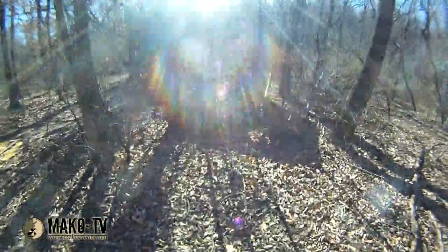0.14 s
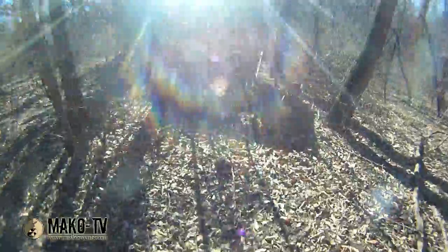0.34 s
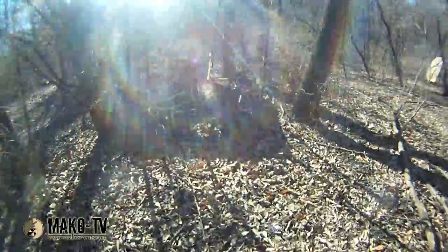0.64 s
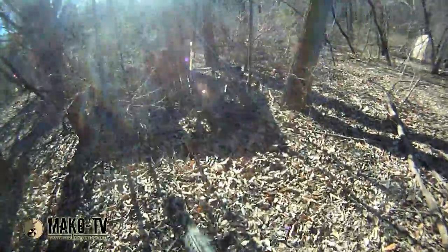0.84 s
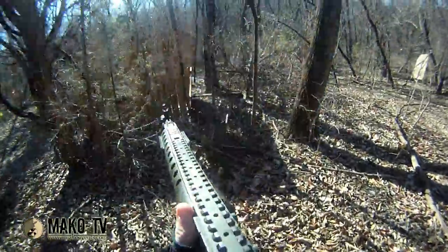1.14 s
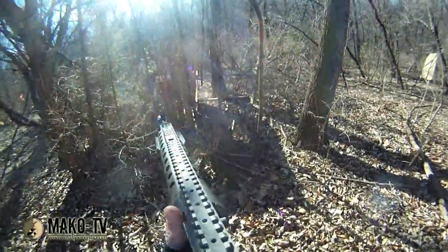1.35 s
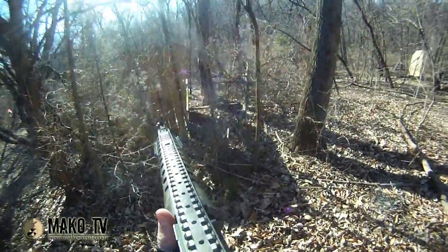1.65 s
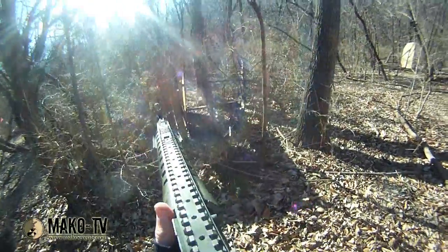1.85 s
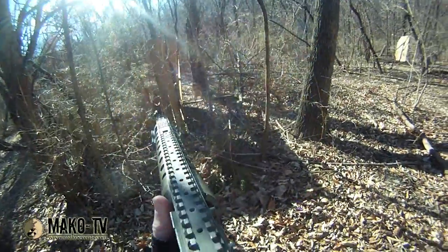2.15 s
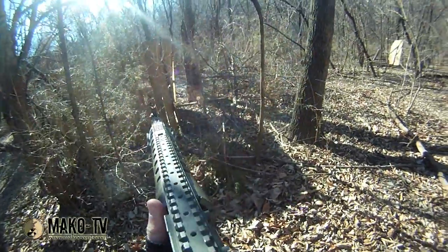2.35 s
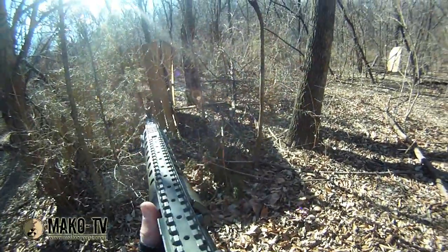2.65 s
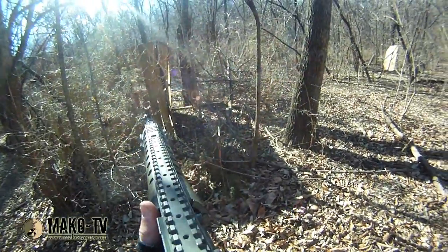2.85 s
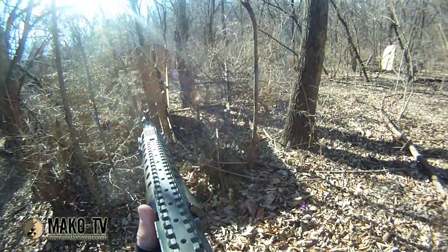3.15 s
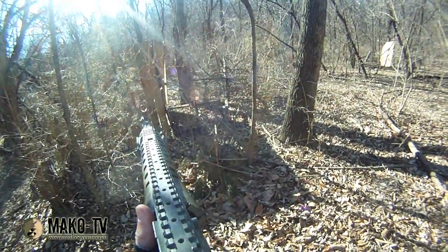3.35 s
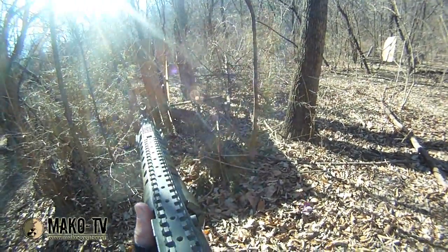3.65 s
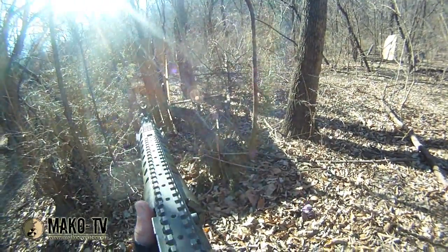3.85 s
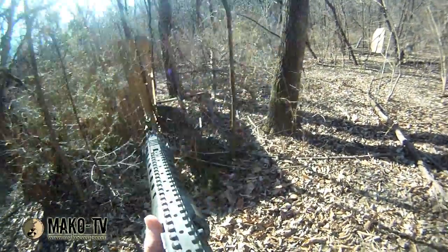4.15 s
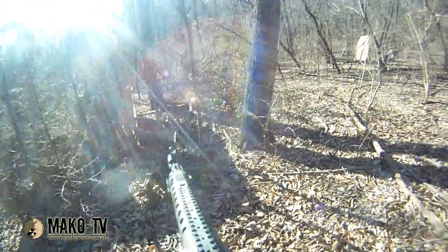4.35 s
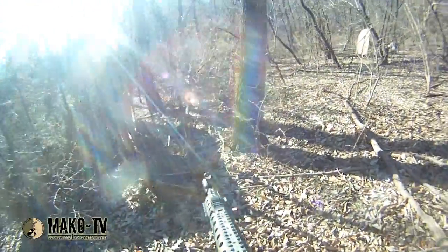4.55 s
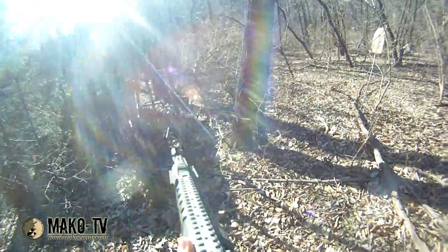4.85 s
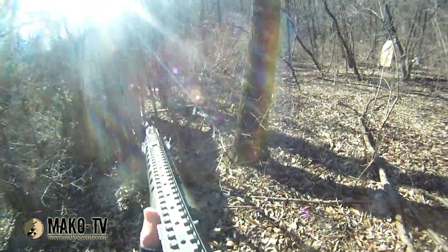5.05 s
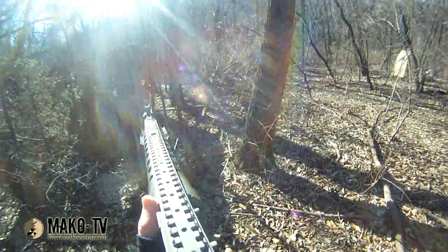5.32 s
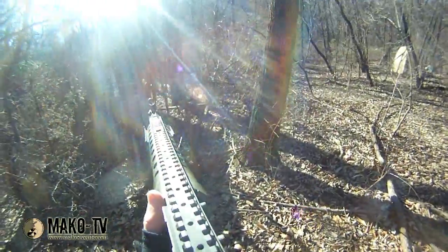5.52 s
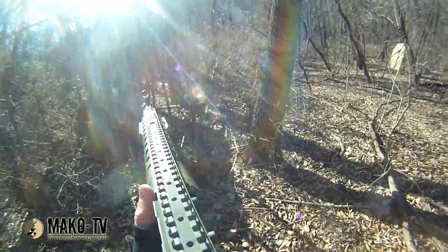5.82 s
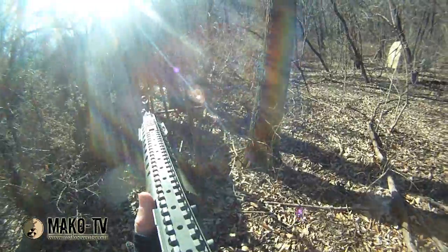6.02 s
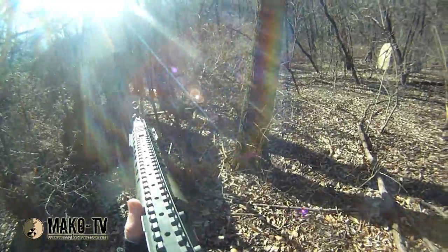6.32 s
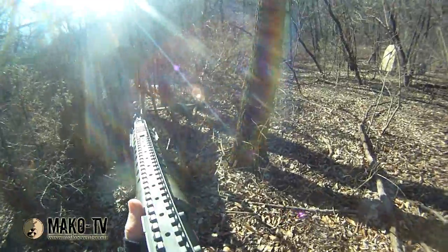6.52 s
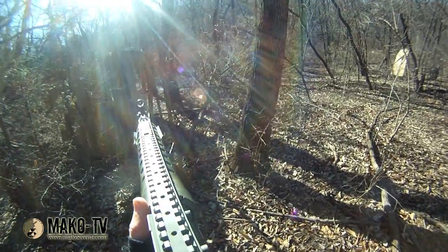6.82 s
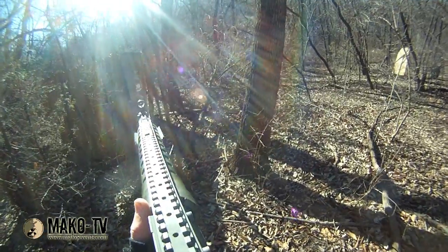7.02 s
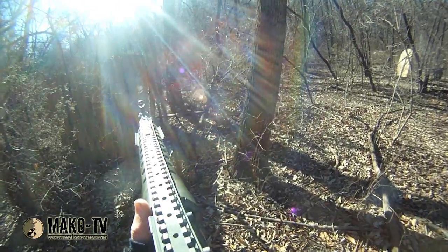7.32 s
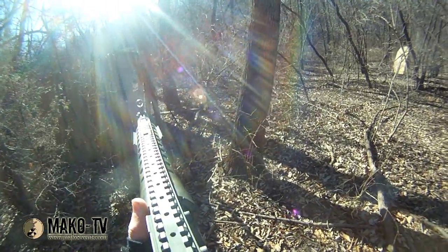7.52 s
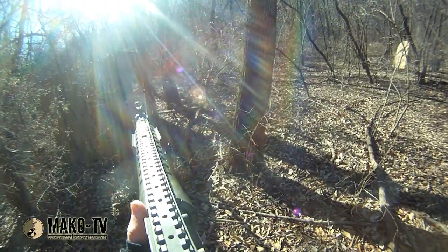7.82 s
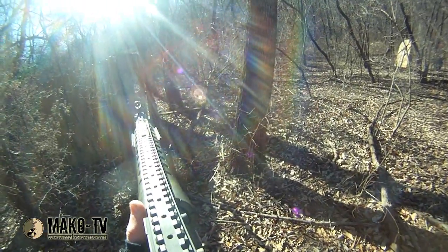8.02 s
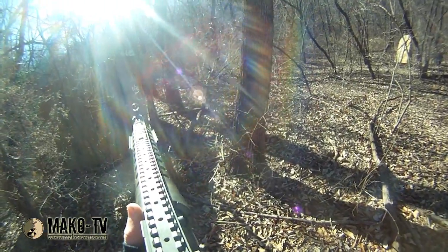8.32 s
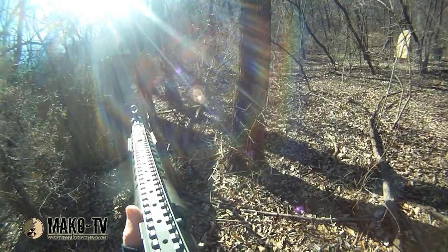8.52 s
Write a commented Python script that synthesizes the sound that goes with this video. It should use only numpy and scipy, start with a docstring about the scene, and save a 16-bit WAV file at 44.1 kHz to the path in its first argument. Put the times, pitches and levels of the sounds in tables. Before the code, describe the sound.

A small cased microphone sits close to an airsoft player in dry woodland. From 0 to 0.8 s wind buffets it and gear knocks the hollow case, hardest around 0.3 to 0.45 s, while bright cracks from other guns snap at 0, 0.6, 1.2 and 1.6 s with faint echoes off trunks. Leaves crackle softly and a brief drag rustles at 1.9 s. From 2.4 to 3.2 s the close electric rifle fires six single shots about 0.15 s apart, each a short gear whirr, a catch click and a loud dry piston clack with a small rebound rattle. Between 4.2 and 5.2 s come wind, sharp clicks, a faint far automatic burst, a crack and a light case knock. Clicks continue. Three shots follow at 6.0 to 6.3 s, four at 7.0 to 7.5 s, two at 8.2 to 8.35 s, then a faint rapid far burst to the end.

```python
"""Airsoft rifle in a wood

An electric airsoft rifle fires fifteen single shots in four groups, close to a small cased camera.
Each trigger pull spins the gearbox up (whine and gear noise), cocks the piston and lets it slam (damped rings).
Other players' guns crack among the trees, gear knocks the camera case (clicks and rings), dry leaves rustle
and wind buffets the microphone (shaped noise)."""
import sys
import numpy as np
from scipy import signal
from scipy.fft import rfft, irfft, next_fast_len
from scipy.io import wavfile
from scipy.ndimage import map_coordinates

SR = 44100
rng = np.random.default_rng(int(sys.argv[2]) if len(sys.argv) > 2 else 0)


def bounce(signal):
    """Save signal as a 16-bit WAV file at the path given by the first command-line argument."""
    frames = np.transpose(np.atleast_2d(signal))
    limited = np.clip(frames, -1, 1)
    pcm = np.round(limited * 32767).astype(np.int16)
    wavfile.write(sys.argv[1], SR, pcm)


N = 382347  # length of the scene in samples


def amp(db):
    """Decibels to a plain factor."""
    return 10 ** (np.asarray(db) / 20)


def unit(x):
    """Scales x to an RMS of 1."""
    return x / np.sqrt(np.mean(x ** 2) + 1e-20)


def coloured(x, spectrum):
    """x through the causal filter with these (Hz, dB) points; white noise keeps its power."""
    f, db = np.transpose(spectrum)
    hz = np.fft.rfftfreq(4096, 1 / SR)
    gain = amp(np.interp(np.log(hz + 1), np.log(f + 1), db))
    # folding the cepstrum gives the minimum-phase pulse: its energy comes as early as possible
    cepstrum = irfft(np.log(gain + 1e-6))
    cepstrum[1:2048] *= 2
    cepstrum[2049:] = 0
    pulse = irfft(np.exp(rfft(cepstrum)))
    return signal.fftconvolve(x, pulse / np.linalg.norm(pulse))[:len(x)]


def wobble(rate, size=N):
    """A smooth random curve, rate knots a second."""
    knots = rng.standard_normal(int(size * rate / SR) + 4)
    return map_coordinates(knots, [np.arange(size) * rate / SR])


def add(out, s, sound):
    """Mixes sound into out from time s on."""
    part = out[max(round(s * SR), 0):][:len(sound)]
    part += sound[:len(part)]


def ring(modes, t, attack, scatter_db):
    """Damped modes after one blow, each a sine that loses 60 dB in its t60."""
    total = np.zeros(len(t))
    for hz, db, t60 in modes:
        level = amp(db + scatter_db * rng.standard_normal() - 60 * t / t60)
        total += level * np.sin(2 * np.pi * hz * t)
    return total * (1 - np.exp(-t / attack))


def burst(t, t60):
    """Noise that starts with a sharp edge and dies away."""
    edge = 0.64 * amp(-60 * t / 0.0018)
    return (amp(-60 * t / t60) + edge) * rng.standard_normal(len(t))


def level_curve(s, db):
    """A level that glides between (seconds, dB) points, as a plain factor."""
    return amp(np.interp(np.arange(N) / SR, s, db))


# Strength of the wind over time. Each row: time in seconds, deep buffeting in dB, flutter in dB.
WIND_LEVELS = [(0.0, -27, -20), (0.1, -38, -39), (0.21, -30.5, -25.5), (0.38, -40.5, -44.5),
               (0.5, -28, -31), (0.65, -33, -31), (0.86, -45, -50), (1.09, -42, -42), (1.31, -31, -36.5),
               (1.54, -45.5, -44), (4.12, -45.5, -44.5), (4.3, -37, -32), (4.45, -31, -27.5),
               (4.6, -30.5, -41), (4.85, -42, -42.5), (5.09, -31, -36.5), (5.2, -37, -44), (5.4, -41, -43),
               (5.9, -46, -45.5), (6.44, -43, -50.5), (6.53, -32, -40.5), (6.8, -36, -41),
               (6.9, -46.5, -48.5), (8.67, -46, -44)]
# Tone colour of the deep buffeting. Each row: frequency in Hz, relative level in dB.
BUFFET_COLOUR = [(12, -36), (20, -15), (59, 0.5), (110, -7.5), (140, -43), (240, -120)]
# Tone colour of the flutter. Each row: frequency in Hz, relative level in dB.
FLUTTER_COLOUR = [(47, -34), (80, -2.5), (151, -4.5), (252, -12.5), (302, -15.5), (450, -24), (580, -54),
                  (990, -120)]


def wind():
    """Wind pushes on the microphone in uneven lumps: deep noise plus a faster, higher flutter."""
    s, deep_db, flutter_db = np.transpose(WIND_LEVELS)
    deep_lumps = amp(2.1 * wobble(6) + 1.25 * wobble(20))
    deep = unit(deep_lumps * coloured(rng.standard_normal(N), BUFFET_COLOUR))
    flutter_lumps = amp(2 * wobble(8) + 3.9 * wobble(35))
    flutter = unit(flutter_lumps * coloured(rng.standard_normal(N), FLUTTER_COLOUR))
    return level_curve(s, deep_db) * deep + level_curve(s, flutter_db) * flutter


# Strength of the wood's own sound. Each row: time in seconds, low murmur in dB, leaves in dB.
AIR_LEVELS = [(0.0, -32.5, -36.5), (0.17, -41.5, -45), (0.42, -29.5, -43.5), (0.59, -48, -57),
              (0.75, -39.5, -49.5), (1.02, -43.5, -52), (1.32, -41, -46), (1.84, -42.5, -51),
              (2.02, -45, -52.5), (2.3, -47.5, -52.5), (3.25, -44, -50), (3.55, -47, -55),
              (3.8, -45.5, -49), (4.22, -46.5, -48), (4.65, -45, -53.5), (5.09, -44, -49), (6.4, -44, -47),
              (6.95, -47, -50.5), (7.53, -45.5, -46), (8.05, -47.5, -61.5), (8.4, -39, -46.5),
              (8.67, -50, -53.5)]
# Tone colour of the murmur, also used for case clicks and thuds. Each row: frequency in Hz, relative level in dB.
MURMUR_COLOUR = [(150, -30), (250, -9), (323, -5), (393, -9), (457, -6), (568, -3), (623, -4), (705, -7.5),
                 (1200, -35), (1560, -45), (2640, -120)]


def murmur():
    """The low murmur of the wood: shaped noise whose level wavers a little."""
    s, murmur_db, _ = np.transpose(AIR_LEVELS)
    wavering = amp(2 * wobble(30))
    noise = unit(wavering * coloured(rng.standard_normal(N), MURMUR_COLOUR))
    return level_curve(s, murmur_db) * noise


TWIGS_PER_S, TWIG_DB, TWIG_SPREAD_DB = 20, 4, 3.5  # average rate, typical level and its spread
# Tone colour of the leaves. Each row: frequency in Hz, relative level in dB.
LEAVES_COLOUR = [(590, 0.5), (1000, -4), (1150, -3), (1330, -2), (1420, -9.5), (1720, -2.5), (1850, -2.5),
                 (2180, 1.5), (2510, 2), (3150, 0.5), (3660, -6), (4970, -4), (6000, -16.5), (7800, -44),
                 (13200, -120)]


def leaves():
    """Leaves crackle unevenly: wavering noise, with short bumps where single leaves and twigs snap."""
    s, _, leaves_db = np.transpose(AIR_LEVELS)
    snaps_now = rng.random(N) < TWIGS_PER_S / SR
    ticks = snaps_now * amp(TWIG_DB + TWIG_SPREAD_DB * rng.standard_normal(N))
    fading_ticks = signal.lfilter([1], [1, -np.exp(-1 / (0.0032 * SR))], ticks)  # fades over 3.2 ms
    crackle = amp(0.97 * wobble(110)) + fading_ticks
    return level_curve(s, leaves_db) * unit(coloured(crackle * rng.standard_normal(N), LEAVES_COLOUR))


# Knocks on the camera case. Each row: time in seconds, level in dB, damping (divides the ring times).
CASE_KNOCKS = [(0.002, -13.5, 0.84), (0.176, -19.5, 0.8), (0.325, -7.5, 1.6), (0.349, -4, 1.03),
               (0.375, -15, 1.26), (0.419, -6, 1.2), (0.462, -21, 3.3), (0.765, -10.5, 1.7),
               (1.597, -17.5, 1.44), (5.033, -19, 0.95)]
# How the hollow case rings. Each row: frequency in Hz, level in dB, time to fall 60 dB in seconds.
CASE_MODES = [(603.7, -1, 0.14), (1325, -29, 0.16), (424, -15, 0.103)]


def knocks():
    """Each knock clicks and rings the hollow case; a hand on it damps the ring."""
    rings, clicks = np.zeros((2, N))
    t = np.arange(SR // 4) / SR
    for s, db, damping in CASE_KNOCKS:
        modes = [(hz, level, t60 / damping) for hz, level, t60 in CASE_MODES]
        wavering = amp(db - 1.5 + 1.5 * wobble(150, len(t)))
        add(rings, s, wavering * ring(modes, t, 0.0006, 0.91))
        add(clicks, s, amp(db - 8.5) * burst(t, 0.011))
    return rings + coloured(clicks, MURMUR_COLOUR)


# Another player's gun. Each row: time in seconds, level in dB, pitch in Hz, echo in dB relative to the crack.
RIVAL_SHOTS = [(0.0195, -15, 2840, -21.5), (0.595, -14, 2230, -17), (1.2058, -13.5, 2250, -18.5),
               (1.6291, -17, 2270, -13.5), (4.6929, -21.5, 2850, -15)]
RIVAL_T60, RIVAL_THUD_DB = 0.037, -5.5  # fall time in seconds, thud relative to the crack
# the second crack of a rival's shot: delay, level relative to the first, pitch, thud
SECOND_S, SECOND_DB, SECOND_HZ, SECOND_THUD_DB = 0.0163, -8, 2225, 2
# Single clicks of pellets, twigs and gear. Each row: time in seconds, level in dB, pitch in Hz,
# time to fall 60 dB in seconds, thud in dB relative to the click.
SMALL_CLICKS = [(0.1765, -33, 1850, 0.05, 8.5), (0.3117, -21, 2400, 0.018, -9),
                (0.7162, -26, 2980, 0.028, -18), (0.8679, -24.5, 2130, 0.024, -14),
                (0.9639, -17.5, 2730, 0.027, -5.5), (1.4726, -34.5, 2190, 0.024, 9),
                (2.238, -38.5, 2520, 0.017, 8), (2.277, -41, 4830, 0.022, -12),
                (3.5382, -36.5, 2560, 0.022, 0), (3.9838, -36, 4020, 0.02, -6),
                (4.157, -32, 2850, 0.037, -6), (4.2303, -26, 2330, 0.016, -25),
                (4.5259, -18, 2710, 0.043, -14), (4.5829, -27, 2900, .029, 2.5),
                (4.62, -35.5, 2930, .03, -19), (4.7598, -22, 2350, 0.04, -14),
                (4.792, -30.5, 2830, 0.048, -18), (5.0549, -30, 3060, 0.02, -5),
                (5.6215, -33.5, 2300, 0.027, -8), (5.7028, -36, 2320, .025, -17),
                (5.788, -33.5, 1640, 0.042, -10), (6.2285, -18, 3025, 0.016, -14),
                (6.3837, -21, 2950, 0.029, -11), (6.492, -33, 1960, .029, -14),
                (6.8987, -32.5, 2700, .025, -16), (7.217, -21.5, 3060, 0.074, -7),
                (7.2408, -18.5, 2240, 0.051, -11), (7.5336, -30.5, 2780, 0.018, -7),
                (7.6221, -39, 2660, 0.015, -14), (7.6786, -36, 2110, .01, -22),
                (7.8032, -30.5, 3640, .03, -17), (7.86, -44, 3030, .02, -10),
                (8.0007, -24, 2260, 0.02, -31), (8.0696, -35.5, 4300, .025, -14),
                (8.089, -37.5, 2230, 0.048, -14)]
CLICK_ECHO_DB = -24.5  # for the small clicks and the far gun
# A far gun on automatic fire. Each row: first shot in seconds, number of shots, shots per second, level in dB.
FAR_GUN_BURSTS = [(4.385, 3, 21.4, -37.5), (8.4115, 7, 23.8, -36.5)]
FAR_HZ, FAR_T60, FAR_THUD_DB = 2720, 0.029, -27  # average pitch, fall time in seconds, thud
# Tone colour of the snaps, also of drags through leaves. Each row: frequency in Hz, relative level in dB.
DRAG_COLOUR = [(290, -63), (500, 5.5), (669, -4.5), (1070, -11), (1540, -10), (2990, -2), (3920, -8.5),
               (4260, -14.5), (4870, -4), (6000, -20), (7800, -33), (13200, -120)]
# Tone colour of the echo from the trees. Each row: frequency in Hz, relative level in dB.
ECHO_COLOUR = [(590, -40), (1000, -11), (1490, -7), (1910, -8), (2200, 4.5), (2770, 0), (3150, 0),
               (3630, -13), (3970, -2), (4310, -16), (4860, -5), (5650, -11.5), (6000, -33), (7800, -38),
               (13200, -120)]


def crack_events():
    """Lists every crack and click as (seconds, dB, pitch Hz, t60 seconds, thud dB, echo dB)."""
    events = []
    for s, db, hz, echo_db in RIVAL_SHOTS:
        events.append((s, db, hz, RIVAL_T60, RIVAL_THUD_DB, echo_db))
        events.append((s + SECOND_S, db + SECOND_DB, SECOND_HZ, RIVAL_T60, SECOND_THUD_DB, echo_db))
    for s, db, hz, t60, thud_db in SMALL_CLICKS:
        events.append((s, db, hz, t60, thud_db, CLICK_ECHO_DB))
    for s, count, rate, db in FAR_GUN_BURSTS:
        for k in range(round(count)):
            shot_db = db + 1.2 * rng.standard_normal()
            hz = FAR_HZ * (1 + 0.125 * rng.standard_normal())
            events.append((s + k / rate, shot_db, hz, FAR_T60, FAR_THUD_DB, CLICK_ECHO_DB))
    return events


def cracks():
    """A snap with its own pitch, a thud through the case, and a grainy echo from trunk after trunk."""
    snaps, echoes, thuds, tones = np.zeros((4, N))
    tail = np.arange(SR // 3) / SR
    t = tail[:SR // 12]
    for s, db, hz, t60, thud_db, echo_db in crack_events():
        add(snaps, s, amp(db - 5.5) * burst(t, t60))
        grain_db = 2.94 * wobble(107, len(tail))
        add(echoes, s, amp(db + echo_db + grain_db) * burst(tail, 0.52))
        add(tones, s, amp(db - 1) * ring([(hz, 0, 0.83 * t60)], t, 0.00028, 0))
        add(thuds, s, amp(db + thud_db + 2.5) * burst(t, t60))
    noise = coloured(snaps, DRAG_COLOUR) + coloured(echoes, ECHO_COLOUR) + coloured(thuds, MURMUR_COLOUR)
    return noise + tones


DRAG_RISE_S, DRAG_FALL_S = 0.031, 0.069
# A boot or sleeve in the leaves. Each row: start in seconds, length before the fade in seconds, level in dB.
LEAF_DRAGS = [(0.195, 0.077, -42.5), (1.897, 0.12, -37), (4.919, 0.084, -41.5), (5.705, 0.12, -43)]


def rustles():
    """A boot or sleeve drags through leaves: short strokes of rough, shaped noise."""
    t = np.arange(N) / SR
    roughness = amp(2.5 * wobble(160))
    drag = unit(coloured(roughness * rng.standard_normal(N), DRAG_COLOUR))
    strokes = np.zeros(N)
    for s, length, db in LEAF_DRAGS:
        end = s + length
        strokes += amp(db) * np.interp(t, [s, s + DRAG_RISE_S, end, end + DRAG_FALL_S], [0, 1, 1, 0])
    return strokes * drag


# Trigger pulls. Each row: piston slam in seconds, motor in dB, gear catch in dB, slam in dB,
# and how many seconds before the slam the motor starts.
TRIGGER_PULLS = [(2.4558, 0, 0.5, -2, 0.056), (2.6192, -2, 1.5, -1, 0.061), (2.778, 0, 0, 0, 0.06),
                 (2.913, 0.5, -0.5, 0.5, .0583), (3.0478, 0, 1, 0, 0.06), (3.1751, 1, -2, 0, 0.058),
                 (6.0238, -1.5, 0.5, -1, .0616), (6.181, 1.5, -1.5, 0.5, 0.057),
                 (6.3346, 0.5, 0.5, -0.5, 0.057), (7.0163, -1, 0.5, 0, 0.06), (7.1754, 0, -0.5, 0, .0616),
                 (7.3233, -2, 1.5, -0.5, 0.061), (7.463, 1, 0.5, 1, 0.058), (8.1873, 0, 0, -1.5, 0.058),
                 (8.3419, 0, 0, -0.5, 0.064)]
# One gearbox cycle. Each row: seconds from the slam (the first two rows: from the motor's start),
# shaft turns per second, gear noise in dB, whine in dB.
GEARBOX_CYCLE = [(-.006, 198.8, -43.5, -69), (.0015, 240, -21, -44), (-.049, 275, -16, -46),
                 (-.042, 281, -21, -18.5), (-.025, 295, -21, -19), (-.011, 296, -19, -13.5),
                 (-.005, 288, -20, -13.5), (-.0005, 278, -19, -30), (.008, 265, -26.5, -22.5),
                 (0.013, 255, -27.5, -29), (.041, 267, -37, -25), (.066, 230, -53, -50)]
# Tones of the whine. Each row: multiple of the shaft speed, level in dB.
WHINE_ORDERS = [(2.5, -10.5), (7, -25), (9, -5), (10, -4.5)]
# Tone colour of the gear noise. Each row: frequency in Hz, relative level in dB.
GEAR_COLOUR = [(240, -44), (400, -6.5), (781, 0), (1260, -14), (1910, 0), (2970, -2), (3520, -3.5),
               (3990, -3.5), (4370, -13), (4950, 0.5), (5240, -11), (5480, -9.5), (6000, -28.5),
               (7800, -38), (13200, -120)]
# Sharp contacts, the gear catch first. Each row: seconds from the slam, level in dB, time to fall 60 dB in seconds.
SHARP_CONTACTS = [(-.0474, -8.5, 0.027), (-.0064, -11, 0.0071), (.0041, -7.5, 0.011),
                  (.0091, -20.5, 0.0079)]
# Ring as the sector gear meets the piston. Each row: frequency in Hz, level in dB, time to fall 60 dB in seconds.
CATCH_MODES = [(620, 5, 0.024), (670, -65, 0.029), (449, -33.5, 0.073), (3635, -5.5, 0.023)]
# The piston is let go, lands and rebounds on its spring. Each row: seconds from the slam, level in dB.
PISTON_BLOWS = [(-.0066, -16), (.0003, -0.5), (.0046, 4.5), (.0089, -43), (.0131, -5), (.02, -8.5),
                (.0268, -10), (.032, -11), (.0385, -10.5)]
# Ring of the receiver. Each row: frequency in Hz, level in dB, time to fall 60 dB in seconds.
RECEIVER_MODES = [(462.6, -15.5, 0.039), (559, -15.5, 0.059), (658, -12.5, 0.038), (724, -29, 0.067),
                  (148, -28, 0.069)]


def gearbox(when, u):
    """One cycle's whine, locked to the shaft's angle, and its gear noise, loudest once a turn."""
    _, turns, noise_db, whine_db = np.transpose(GEARBOX_CYCLE)
    unsteady = 1 + 0.00634 * rng.standard_normal() + 0.0044 * wobble(300, len(u))
    angle = 2 * np.pi * np.cumsum(np.interp(u, when, turns) * unsteady) / SR
    whine = np.zeros(len(u))
    for order, db in WHINE_ORDERS:
        whine += amp(db + 5.3 * wobble(406.4, len(u))) * np.sin(order * angle + 7 * rng.random())
    # the gears sing only under load, so the whine dies just after the slam
    loaded = amp(-1500 * np.clip(u - 0.01, 0, 1))
    whine *= amp(np.interp(u, when, whine_db)) * loaded
    teeth = amp(1.96 * np.cos(angle + 7 * rng.random()) + 0.6 * wobble(497, len(u)))
    noise = amp(np.interp(u, when, noise_db)) * teeth * rng.standard_normal(len(u))
    return whine, noise


def rifle():
    """The gearbox runs, a gear catches the piston, which is let go, slams, rebounds and swings the air."""
    tones, metal = np.zeros((2, N))
    t = np.arange(SR // 8) / SR
    s = np.transpose(GEARBOX_CYCLE)[0]
    for slam_s, motor_db, catch_db, slam_db, lead in TRIGGER_PULLS:
        when = s - lead * (np.arange(len(s)) < 2)
        u = np.arange(when[0], when[-1], 1 / SR)  # seconds from the slam
        whine, noise = gearbox(when, u)
        add(tones, slam_s + u[0], amp(motor_db) * whine)
        add(metal, slam_s + u[0], amp(motor_db) * noise)
        for k, (delay, db, t60) in enumerate(SHARP_CONTACTS):
            pull_db = catch_db if k == 0 else slam_db
            add(metal, slam_s + delay, amp(db + pull_db) * burst(t, t60))
        add(tones, slam_s - 0.0472, -amp(catch_db) * ring(CATCH_MODES, t, 0.0025, 1.5))
        for delay, db in PISTON_BLOWS:
            attack = 0.0003 if db > -5 else 0.0012  # weaker blows land softly
            add(tones, slam_s + delay, amp(slam_db + db) * ring(RECEIVER_MODES, t, attack, 3.1))
        # the piston rushing forward draws air behind it, then stops: one slow swing of pressure
        swing = -np.cos(2 * np.pi * 132 * (u + 0.0017)) * np.exp(-((u + 0.0004) / 0.0058) ** 2)
        add(tones, slam_s + u[0], amp(slam_db - 14.5) * swing)
    return tones + coloured(metal, GEAR_COLOUR)


def scene():
    """All the sources together, as one channel."""
    surroundings = wind() + murmur() + leaves() + rustles()
    return (surroundings + knocks() + cracks() + rifle())[None]


HOLD_HZ = 12000  # samples the converter takes per second
TOP_HZ, END_HZ = 15250, 16500  # the treble starts to fall, and ends


def record(dry):
    """The converter takes few samples a second and holds each one, which mirrors the sound around its rate."""
    m = next_fast_len(N + SR // 2)
    hz = np.fft.rfftfreq(m, 1 / SR)
    # the preamplifier rounds the highest peaks
    soft = dry / (1 + np.abs(dry / 0.88) ** 6) ** (1 / 6)
    kept = (hz < HOLD_HZ / 2) * (hz > 18)
    sampled = irfft(rfft(soft, m) * kept, m)
    mirrored = sampled * (1 + 2 * np.cos(2 * np.pi * HOLD_HZ * np.arange(m) / SR))
    holding = np.sinc(hz / HOLD_HZ)  # holding each sample dulls the treble
    edge = amp(-np.clip(hz - TOP_HZ, 0, 500) * 0.07) * (hz < END_HZ)
    return irfft(rfft(mirrored) * holding * edge, m)[:, :N]


dry = scene()
out = record(dry)
bounce(out)
```